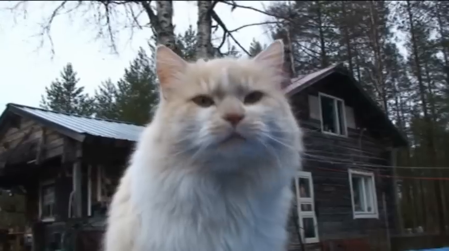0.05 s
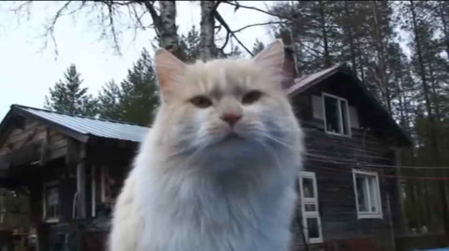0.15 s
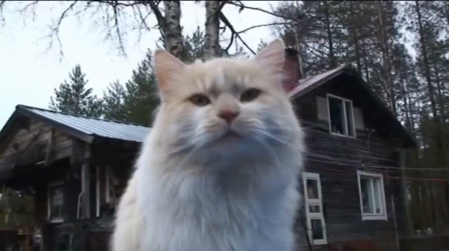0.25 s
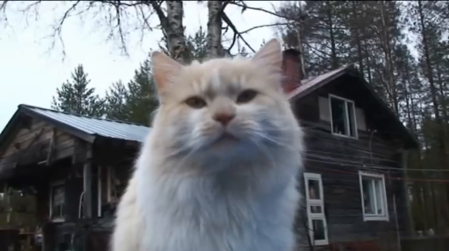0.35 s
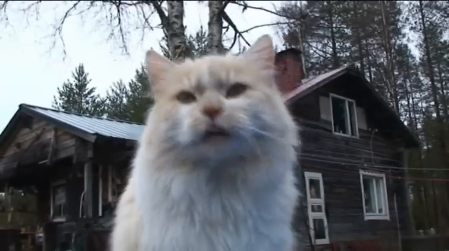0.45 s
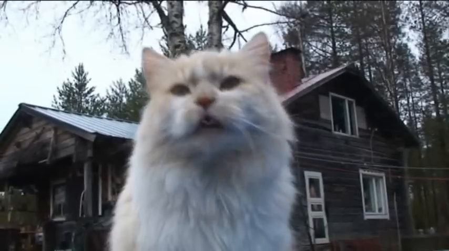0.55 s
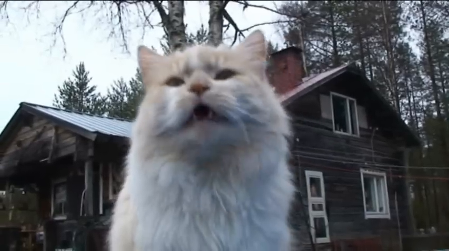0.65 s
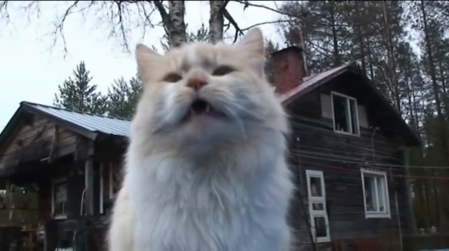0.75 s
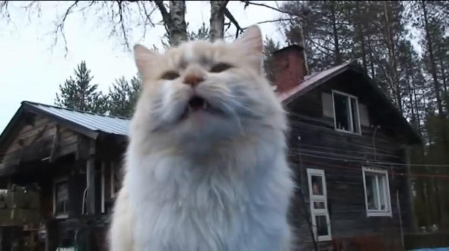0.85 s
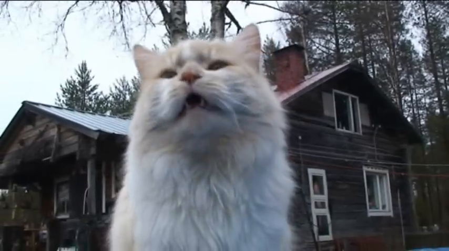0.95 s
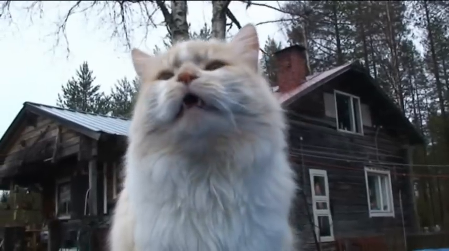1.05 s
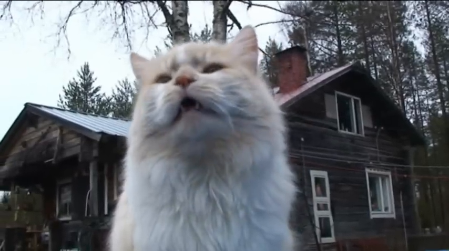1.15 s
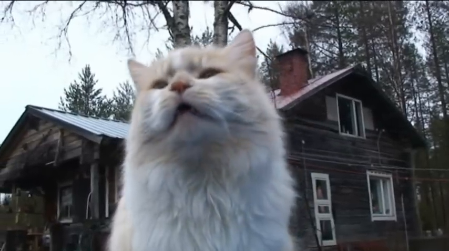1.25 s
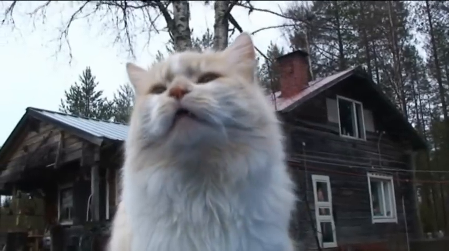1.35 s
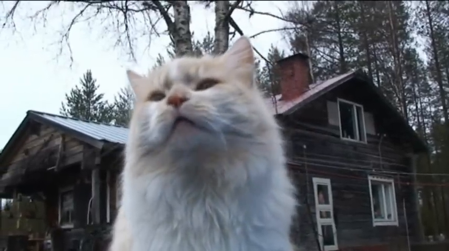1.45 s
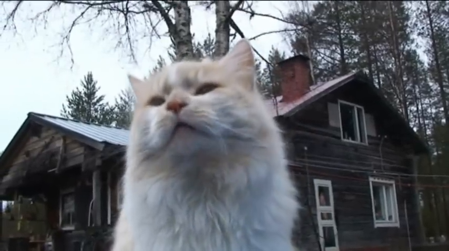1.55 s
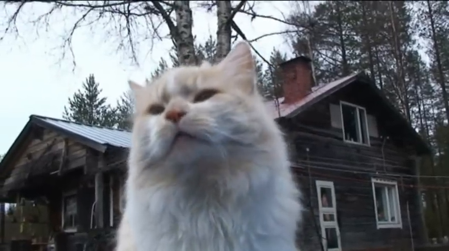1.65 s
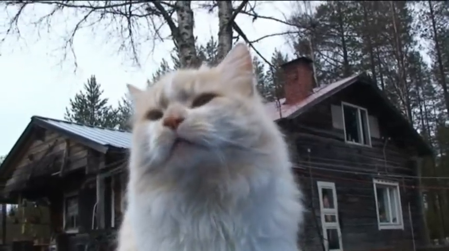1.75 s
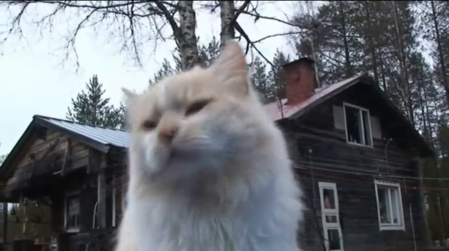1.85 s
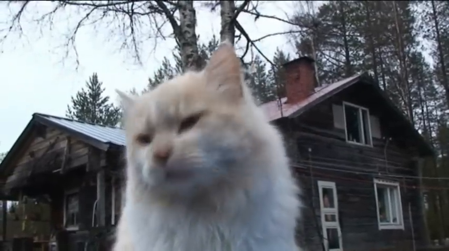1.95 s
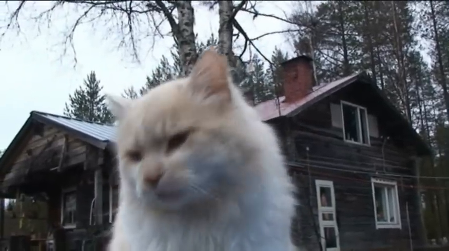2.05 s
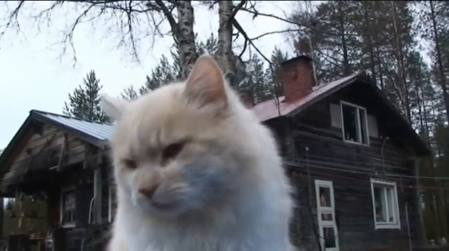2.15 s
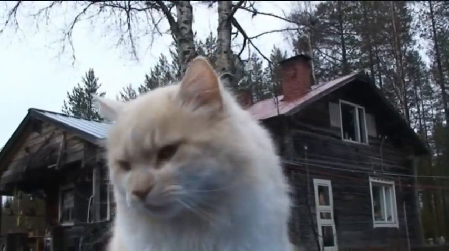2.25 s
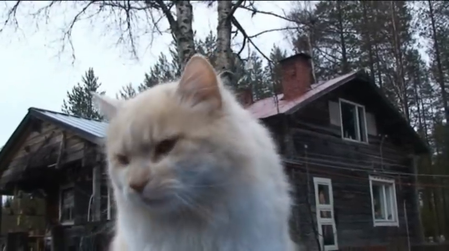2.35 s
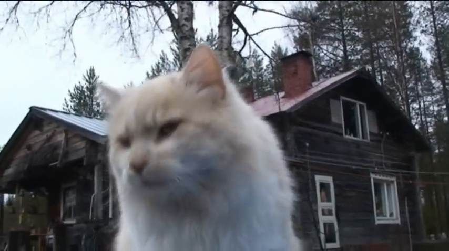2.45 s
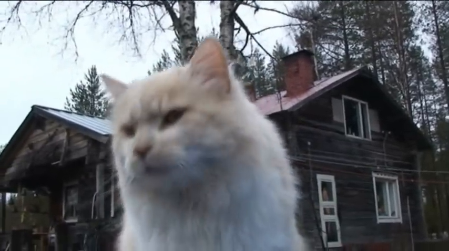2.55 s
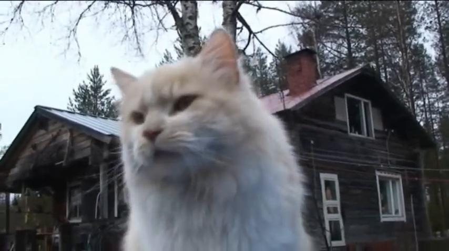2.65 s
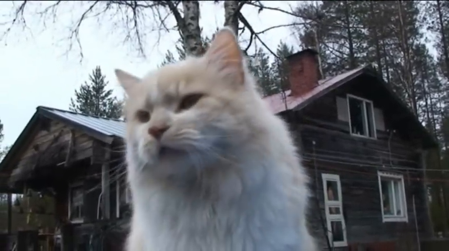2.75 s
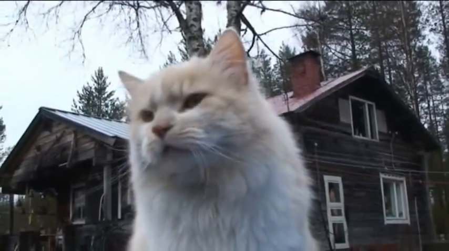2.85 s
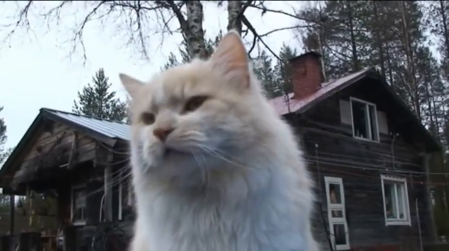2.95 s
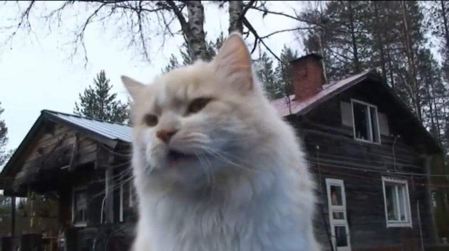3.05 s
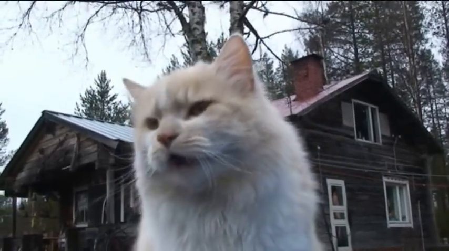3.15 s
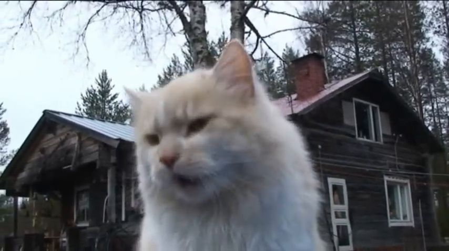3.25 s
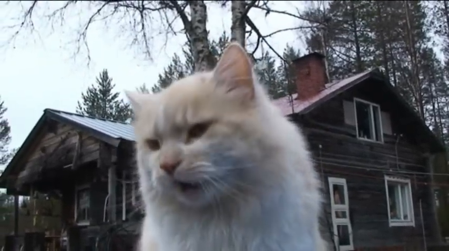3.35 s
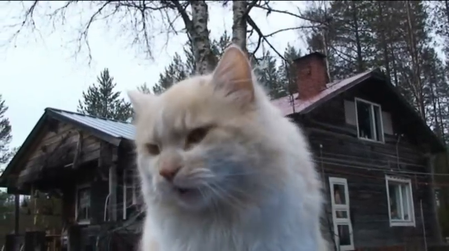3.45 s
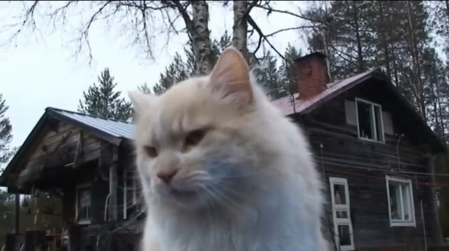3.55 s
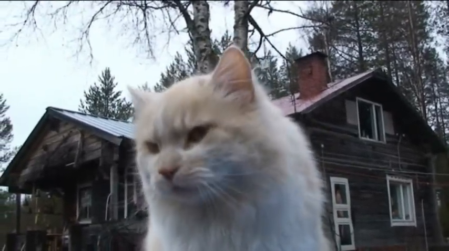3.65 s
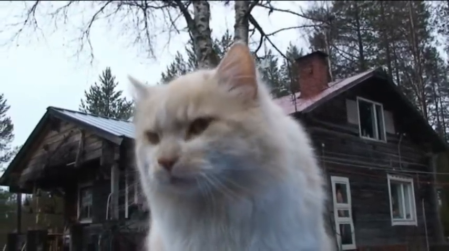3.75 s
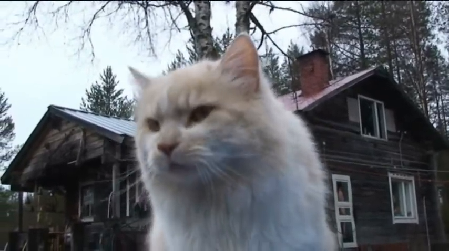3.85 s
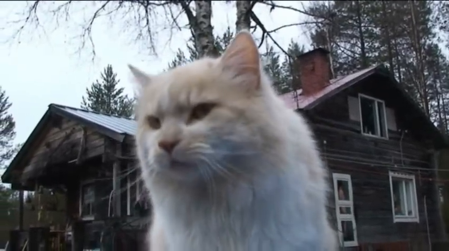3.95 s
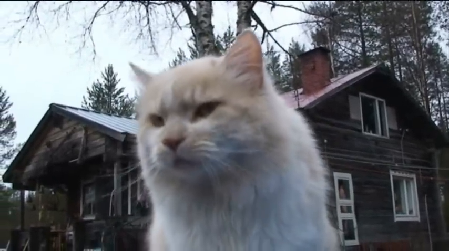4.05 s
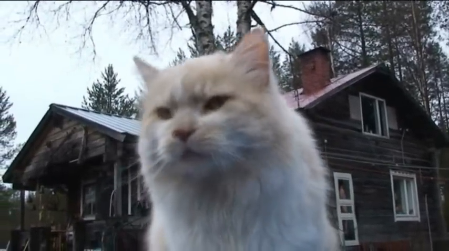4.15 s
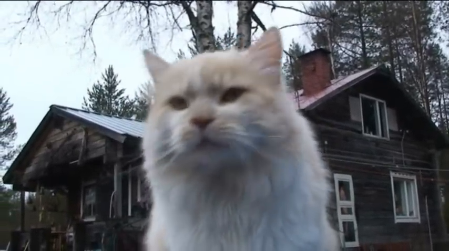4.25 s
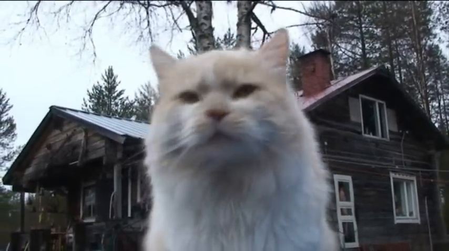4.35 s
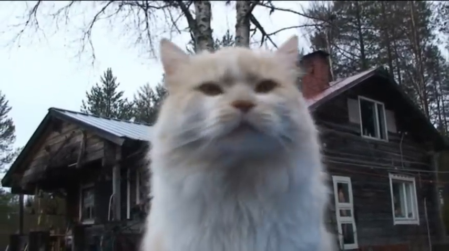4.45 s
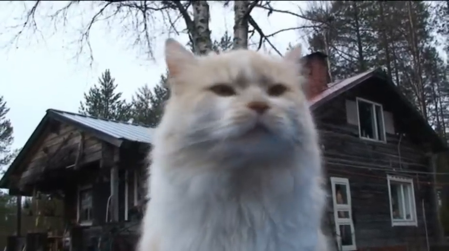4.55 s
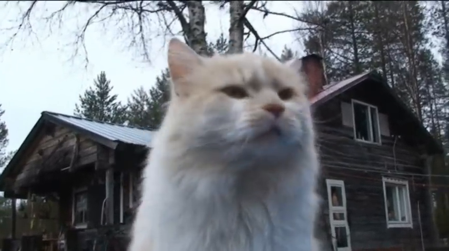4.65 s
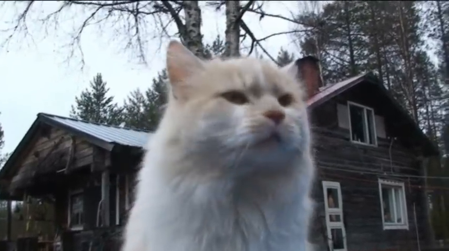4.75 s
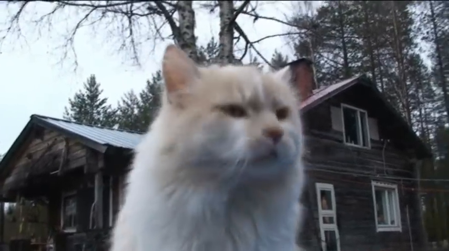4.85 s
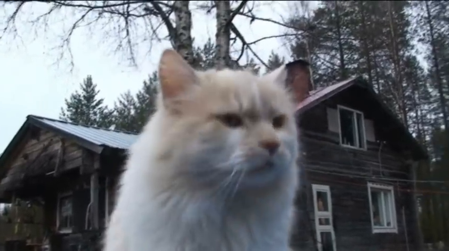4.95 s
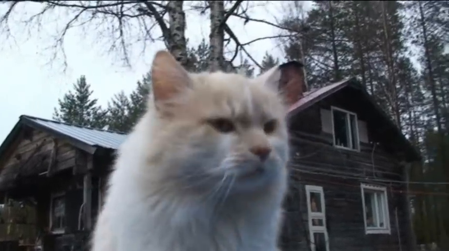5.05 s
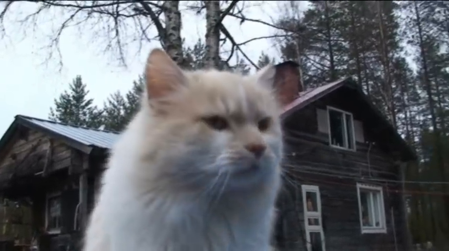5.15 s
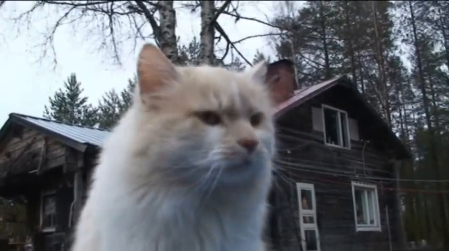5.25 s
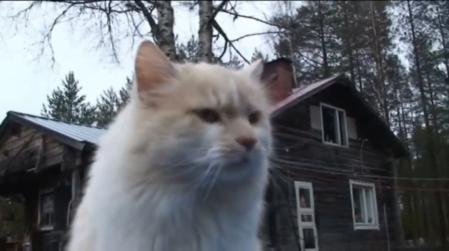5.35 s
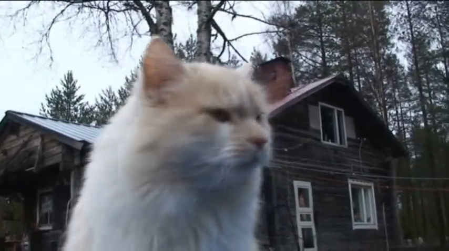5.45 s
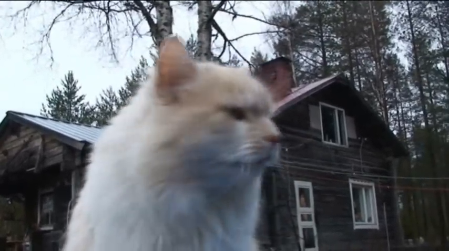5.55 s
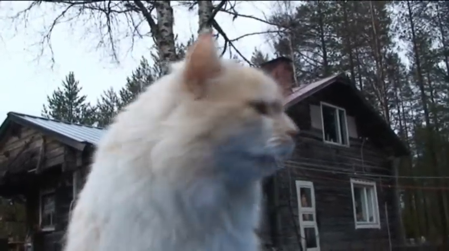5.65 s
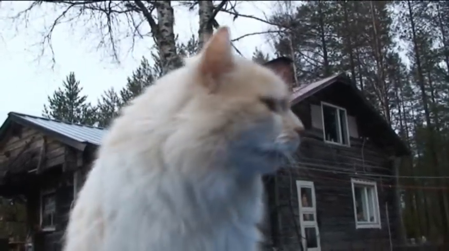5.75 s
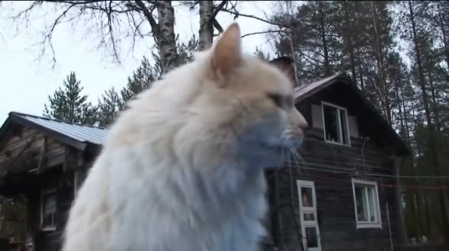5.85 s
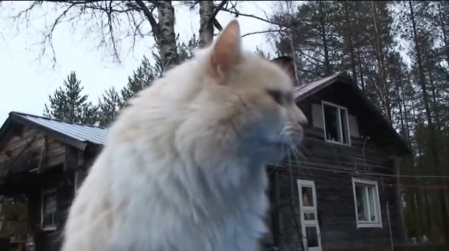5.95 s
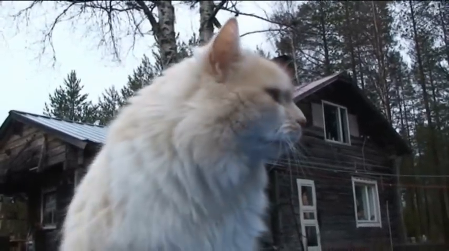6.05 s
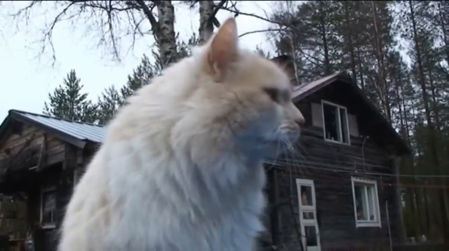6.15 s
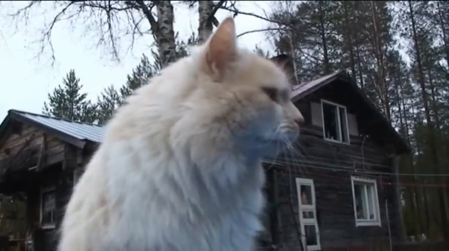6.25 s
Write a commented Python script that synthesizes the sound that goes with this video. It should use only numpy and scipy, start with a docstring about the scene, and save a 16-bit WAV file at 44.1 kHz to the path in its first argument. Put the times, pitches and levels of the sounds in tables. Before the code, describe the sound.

After a short rustle and hand thump, a cat meows three times with wet mouth clicks, over soft hiss, wind and motor hum.

```python
"""Quiet yard, a cat close in front of a hand-held camera; motor hum, microphone hiss and wind rumble throughout.
The take opens on a short rustle, dry ticks and hands bumping the housing, whose modes ring; more bumps follow.
A wet mouth click, then three meows, near 0.7, 3.0 and 5.6 s: gliding partials picked out by mouth resonances.
The voice stutters into each meow and cracks into uneven pulses; a few thin faint whistles come and go.
More clicks fall between and within the meows; a faint echo of the yard follows the cat."""
import sys
import numpy as np
from scipy import signal
from scipy.fft import rfft, irfft
from scipy.io import wavfile
from scipy.ndimage import uniform_filter1d

SR = 44100
rng = np.random.default_rng(int(sys.argv[2]) if len(sys.argv) > 2 else 0)


def level_to_linear(level):
    """Convert decibel levels to linear amplitude factors, elementwise."""
    exponent = np.asarray(level, float) / 20
    return 10 ** exponent


def persist_wave(psi):
    """Save psi, clipped to +-1, as 16-bit WAV."""
    counts = np.round(np.clip(psi, -1, 1) * 32767).astype(np.int16)
    wavfile.write(sys.argv[1], SR, np.atleast_2d(counts).T)


N = 277830  # 6.3 s
T = np.arange(N) / SR
OPPOSITE = np.array([[1], [-1]])  # a side signal enters left and right with opposite signs


def sides(pan_db):
    """Left and right gains that differ by pan_db, left minus right."""
    return level_to_linear(np.array([pan_db, -pan_db]) / 2).reshape(2, -1)


def walk(rate):
    """Random levels held for 1 / rate s and smoothed twice; spread near 1."""
    held = int(SR / rate)
    steps = np.repeat(rng.standard_normal(N // held + 1), held)
    smooth = uniform_filter1d(uniform_filter1d(steps, held), held)
    return np.sqrt(2) * smooth[:N]


def coloured(points):
    """Spectra of two unrelated noises of rms 1, coloured by points of f/Hz, level/dB."""
    hz, db = np.transpose(points)
    bins_hz = np.arange(N // 2 + 1) * SR / N
    gain = level_to_linear(np.interp(np.log(bins_hz + 1), np.log(hz), db))
    return rfft(rng.standard_normal((2, N))) * gain / np.sqrt(np.mean(gain ** 2))


def hold(start, end, fade):
    """Envelope that rises around start, stays at 1 and falls around end."""
    return np.clip(np.minimum(T - start, end - T) / fade + .5, 0, 1)


def add_mode(out, s, hz, t60, gain, rise=.0003, turns=0):
    """Adds a struck resonance: a sine from time s that rises quickly and decays 60 dB in t60 seconds."""
    i = int(s * SR)
    t = T[:min(int(t60 * SR), N - i)]
    envelope = (1 - np.exp(-t / rise)) * np.exp(-np.log(1000) * t / t60)
    out[..., i:i + len(t)] += gain * envelope * np.sin(2 * np.pi * (hz * t + turns))


# Motor partials: multiple of the motor rate, level/dB rms before waver and pan, left minus right/dB
MOTOR_PARTIALS = [(1, -60, 7), (4, -78, -1), (6, -80, 1.5), (14, -83, 1.5), (18, -82, 1.5), (28, -89, .1),
                  (30, -85, .1), (34, -87, .1), (36, -88, .1), (38, -86, .1), (44, -88, .1), (46, -87, .1),
                  (52, -86, .1)]


def motor_hum():
    """Harmonics of the motor's rate; all their levels waver a little together."""
    motor_hz = 150.
    waver_db = 1.1 * walk(12)
    start = rng.uniform(0, 2 * np.pi, len(MOTOR_PARTIALS))
    out = np.zeros((2, N))
    for (k, db, pan_db), phase in zip(MOTOR_PARTIALS, start):
        tone = np.sin(2 * np.pi * k * motor_hz * T + phase)
        out += np.sqrt(2) * level_to_linear(db + waver_db) * sides(pan_db) * tone
    return out


# Colour of the hiss above the low roll-off: f/Hz, relative level/dB per Hz
HISS_COLOUR = [(100, -34), (170, -7.5), (194, -8), (318, -10.5), (596, -11.5), (1700, -18), (2130, -18),
               (2480, -21), (14300, -26), (16000, -31.5)]
# Likeness of the left and right microphone hiss: f/Hz, likeness (0-1)
HISS_LIKENESS = [(200, 0.28), (1500, 0.29), (6000, 0.05), (15000, 0.2)]


def microphone_hiss():
    """Smooth coloured noise, partly shared by both sides: a mid noise plus a weaker opposed side noise."""
    hiss_db = -58  # rms of the mid
    mid, side = coloured([(20, -40), (90, -4.5)] + list(HISS_COLOUR))
    hz, share = np.transpose(HISS_LIKENESS)
    alike = np.clip(np.interp(np.arange(len(mid)) * SR / N, hz, share), 0, 1)
    side_gain = np.sqrt((1 - alike) / (1 + alike))
    return level_to_linear(hiss_db) * irfft(mid + side * side_gain * OPPOSITE, N)


# Wind gusts: centre t/s, half length/s, level over the steady wind/dB
WIND_GUSTS = [(0.177, 0.11, 9), (2.05, 0.31, 0), (3.6, 0.12, 4.5), (4.014, 0.068, 7)]


def wind_rumble():
    """Low noise of its own on each side; slow swells and gusts move both, faster flutter moves each alone."""
    wind_db, swell_db, flutter_db = -55.5, 2.3, 1.9
    colour = [(5, -21), (20, 2.0), (45, -0.5), (75, -1), (110, -6.5), (200, -14.0), (400, -42.0)]
    rumble = irfft(coloured(colour), N)
    level_db = wind_db + swell_db * walk(3.25)
    for s, half, db in WIND_GUSTS:
        level_db += db * np.exp(-((T - s) / half) ** 2)
    return rumble * level_to_linear(level_db + flutter_db * np.array([walk(9.1), walk(8.4)]))


def rustle():
    """Coloured noise, under way as the take opens, that surges briefly and stops."""
    level_db, surge_db, surge_s, end_s = -46.5, 3.5, 0.033, .048
    mid, side = irfft(coloured([(200, 5), (900, 2), (3500, -1.5), (7000, -13), (16000, -25.0)]), N)
    surge = surge_db * np.exp(-((T - surge_s) / 0.0089) ** 2)
    level = level_to_linear(level_db + surge + 0.76 * walk(280))
    return (mid + 0.59 * side * OPPOSITE) * hold(-1, end_s, 0.0081) * level


# Faint dry ticks: t/s, level of the lower ring/dB, lower ring f/Hz
DRY_TICKS = [(0.03, -32.5, 2420), (0.083, -41.5, 2060), (0.179, -45, 3260), (1.995, -46.5, 2500),
             (4.59, -48, 3000), (5.484, -50, 2140)]


def ticks():
    """Fur or fingers tick: two short rings, centred between the sides."""
    out = np.zeros((2, N))
    for s, db, hz in DRY_TICKS:
        add_mode(out, s, hz, .012, level_to_linear(db))
        add_mode(out, s, 1.29 * hz, .008, level_to_linear(db - 1))
    return out


# Modes of the camera housing: f/Hz, relative level/dB, t60/s, left minus right/dB,
# phase at the blow/turns, lead of the right side/turns
HOUSING_MODES = [(47.5, -3, 1.34, -4.5, 0.07, -0.063), (74.4, 3, 0.23, 0, 0.0051, -0.017),
                 (89.7, -8.5, 0.61, 3, -0.1, -0.11), (155, -1, .07, 12, -.45, .05),
                 (232, 0, .075, 8, .21, .1), (396, -2.5, 0.049, 4, 0.22, 0.27),
                 (578, -3.5, 0.04, 0, -0.07, 0.3)]
# Bumps: t/s, level/dB, f/Hz where the push is strongest, fall-off either side/dB per octave
# (slow pushes are narrow, quick taps broad)
HAND_BUMPS = [(.047, -25, 47, 19), (0.0813, -17.5, 205, 6.4), (.9, -45.5, 82, 16), (1.9, -41.5, 232, 7),
              (1.92, -44, 82, 12), (1.941, -36, 201, 7), (1.993, -35.5, 232, 7.9), (3.401, -39, 82.3, 17),
              (3.417, -36.5, 81.6, 22), (3.488, -41.5, 64.5, 12), (3.661, -47, 84, 16),
              (3.843, -43, 80.4, 22), (4.06, -50, 82, 3), (5.708, -36.5, 82, 30), (5.75, -44, 82, 21),
              (5.766, -33, 79, 27), (5.806, -62, 80, 9)]


def bumps():
    """Hands shift on the housing and its modes reach the microphones through the plastic."""
    out = np.zeros((2, N))
    for s, blow_db, push_hz, fall_db in HAND_BUMPS:
        for hz, db, t60, pan_db, turns, lead in HOUSING_MODES:
            reach_db = blow_db - fall_db * abs(np.log2(hz / push_hz))
            phases = turns + np.array([[0], [lead]])
            add_mode(out, s, hz, t60, level_to_linear(db + reach_db) * sides(pan_db), .003, phases)
    return out


# Wet mouth clicks: t/s, level/dB, lowest ring f/Hz, left minus right/dB
MOUTH_CLICKS = [(0.6748, -28, 1350, 5), (1.495, -36, 765, 4.5), (2.9034, -35.5, 1250, 5),
                (5.609, -47, 1720, 4), (6.138, -48, 1300, -1)]
# Rings of each click: multiple of the lowest ring, relative level/dB, t60/s
CLICK_RINGS = [(1, -2, .018), (1.25, -7, .009), (1.55, 0, .012), (1.8, -9, .006), (4.6, -17, .007)]


def mouth_clicks():
    """Tongue and lips parting ring the mouth: several short modes start at once."""
    out = np.zeros((2, N))
    for s, db, hz, pan_db in MOUTH_CLICKS:
        for k, mode_db, t60 in CLICK_RINGS:
            add_mode(out, s, k * hz, t60, level_to_linear(db + mode_db) * sides(pan_db))
    return out


def meow_at(s):
    """Index of the meow whose middle is nearest in time."""
    return np.argmin([abs(s - (rows[0][0] + rows[-1][0]) / 2) for rows in MEOW_TRACKS])


# One track per meow: t/s, pitch f/Hz, first partial level/dB before shimmer and pan,
# mouth opening as second partial over first/dB, rasp as upper partials over first/dB
MEOW_TRACKS = [
    [(.776, 730, -46, -9.5, -19), (.8, 817, -42.5, -10, -22), (.83, 934, -46, 6, -23),
     (.87, 1010, -47.5, 3.5, -14.5), (.965, 1057, -49, 2.5, -12.5), (1.1, 1081, -49, -0.5, -20),
     (1.16, 1105, -49.5, -2.5, -15), (1.22, 1066, -49.5, -2.5, -16), (1.36, 1002, -48.5, -5.5, -19.5),
     (1.432, 990, -47.5, -10, -30.5)],
    [(3.117, 770, -41, -16, -29), (3.14, 844, -42, -12.5, -28), (3.17, 902, -43, -18, -28),
     (3.195, 908, -44.5, -5, -18), (3.225, 966, -43.5, -2, -19.5), (3.28, 957, -45, 0.8, -17),
     (3.35, 1018, -47, 0, -15.5), (3.43, 1049, -47.5, 2.5, -13), (3.49, 1025, -46.5, -0.5, -17.5),
     (3.58, 995, -47, -3, -25), (3.625, 950, -48.5, -1.5, -18)],
    [(5.596, 589, -58, -9, -19), (5.63, 638, -48, -5.5, -30), (5.665, 766, -40.5, 3, -35),
     (5.7, 796, -41, -4.5, -28), (5.75, 902, -45, -3.5, -17.5), (5.81, 949, -47, -5.5, -18),
     (5.87, 1026, -50.5, 2, -20), (5.935, 1093, -49.5, -1, -20), (5.97, 972, -51.5, 1, -15),
     (6.035, 1057, -49.5, -8.5, -30), (6.07, 978, -51, -8, -30), (6.12, 966, -49, -25, -32),
     (6.19, 911, -54.5, -21, -15)],
]
# False starts before the folds keep their beat: t/s, length/s, pitch f/Hz, level/dB, opening/dB
FALSE_STARTS = [(0.741, 0.026, 795, -59, -20), (3.034, 0.0085, 650, -51.5, -5),
                (3.06, 0.016, 696, -45.5, -13.5), (3.091, .013, 764, -44, -14), (5.55, 0.043, 586, -58, -1)]
# How the cat holds its head in each meow: throat ring f/Hz, top ring f/Hz at a pitch of 1 kHz,
# top ring over first partial/dB at an opening of 0 dB, left minus right/dB
HEAD_POSES = [(3100, 6130, -28.5, 4.5), (3440, 5870, -28, 5.5), (3240, 5800, -32.5, 3.5)]
# Mouth rings for partials above the second: f/Hz, width/Hz, level relative to the throat ring/dB
MOUTH_RINGS = [(4900, 760, -11.5), (9700, 640, -13)]
# Spells in which every other cycle differs: t/s, length/s, level of the half-way lines/dB
CYCLE_DOUBLINGS = [(1.165, 0.088, -54.5), (1.264, .03, -55), (1.396, 0.0333, -54.5)]
# The lines this puts between the partials: multiple of the pitch, level relative to the spell/dB
HALFWAY_LINES = [(.5, -14), (1.5, -1), (2.5, -15.5), (3.5, -11)]


def pitch_wander():
    """Pitch factor: random jitter, a tremor in the second meow and a leap around each crack."""
    tremor_hz, tremor_dip_s, tremor_percent = 29.2, 3.405, 1.6
    tremor = tremor_percent * hold(3.18, 3.44, .03) * np.cos(2 * np.pi * tremor_hz * (T - tremor_dip_s))
    factor = 1 + 0.0047 * walk(70) + 0.007 * walk(400) - tremor / 100
    for s, _, _, _, leap in VOICE_CRACKS:
        factor += leap / 100 * np.exp(-((T - s - .001) / .0045) ** 2)
    return factor


def crack_dip():
    """Gain of the clear voice, which weakens in a crack as the pitch leaps up."""
    dip_db = np.zeros(N)
    for s, length, _, _, leap in VOICE_CRACKS:
        dip_db[(T > s) & (T < s + length)] = -0.2252 * leap  # dB per % of leap
    return level_to_linear(uniform_filter1d(dip_db, size=60))


def voice():
    """Near-pure partials on the gliding pitch; the mouth picks out the upper ones."""
    throat_width_hz, top_width_hz = 1420, 450
    top_hz_per_pitch_hz, top_db_per_opening_db = 1.1, .4
    air_db, air_width_hz = 3, 300  # air through the folds makes the top ring hiss; dB over that ring's level
    stutter_rasp_db = -30.5
    out = np.zeros((2, N))
    wander, dip = pitch_wander(), crack_dip()
    shimmer = [walk(80) for _ in range(10)]
    air = walk(air_width_hz)
    doubling = sum(level_to_linear(db) * hold(s, s + length, .01) for s, length, db in CYCLE_DOUBLINGS)
    stutters = [[(at, *rest, stutter_rasp_db) for at in (s, s + length)] for s, length, *rest in FALSE_STARTS]
    for rows in MEOW_TRACKS + stutters:
        s, *columns = np.transpose(rows)
        throat_hz, top_hz, top_db, pan_db = HEAD_POSES[meow_at(s[0])]
        on = (T > s[0] - .001) & (T < s[-1] + .001)
        t = T[on]
        hz, first_db, open_db, rasp_db = (np.interp(t, s, c) for c in columns)
        phase = 2 * np.pi * np.cumsum(hz * wander[on]) / SR
        # weak partials come and go
        flicker_db = [2.8 * w[on] for w in shimmer]
        tone = level_to_linear(first_db + 0.48 * shimmer[0][on]) * np.sin(phase)
        tone += level_to_linear(first_db + open_db + 1.05 * shimmer[1][on]) * np.sin(2 * phase + 1)
        # the top ring follows pitch and opening; rasp lifts the other rings
        ring_hz = top_hz + top_hz_per_pitch_hz * (hz - 1000)
        ring_db = top_db + top_db_per_opening_db * open_db
        rings = [(f, w, db + rasp_db) for f, w, db in MOUTH_RINGS + [(throat_hz, throat_width_hz, 0)]]
        rings.append((ring_hz, top_width_hz, ring_db))
        for k in range(3, 11):
            mouth = sum(level_to_linear(db) / (1 + (2 * (k * hz - f) / w) ** 4) for f, w, db in rings)
            tone += level_to_linear(first_db + flicker_db[k - 1]) * mouth * np.sin(k * phase + k)
        tone += level_to_linear(first_db + ring_db + air_db) * air[on] * np.sin(2 * np.pi * np.cumsum(ring_hz) / SR)
        halfway = sum(level_to_linear(db) * np.sin(k * phase) for k, db in HALFWAY_LINES)
        tone += doubling[on] * level_to_linear(flicker_db[0]) * halfway
        # the folds start and stop within a few cycles
        edge = np.clip(np.minimum(t - t[0], t[-1] - t) / 0.0019, 0, 1)
        out[:, on] += np.sqrt(2) * tone * edge * dip[on] * sides(pan_db)
    return out


# The vocal folds lose their beat: t/s, length/s, typical pulse level/dB, ring f/Hz, pitch leap/%
VOICE_CRACKS = [(0.87, .007, -30.5, 1800, 15.5), (0.898, .003, -30, 1680, 10),
                (0.934, .004, -27, 1740, 14.5), (0.9375, .008, -30.5, 1520, -7),
                (1.15, .003, -31, 1700, 11.5), (1.1562, .011, -32.5, 1548, -11.5),
                (1.199, .009, -36.5, 1720, 10), (1.4016, .012, -39.5, 1608, 5),
                (1.428, .009, -37.5, 1544, 3.5), (1.434, .016, -40.5, 870, 0), (2.962, .006, -43, 815, 0),
                (2.969, .009, -46, 1450, 0), (3.677, .018, -45.5, 960, 0),
                (5.585, 0.0045, -43.5, 2080, -1.5), (6.033, 0.0049, -39.5, 1530, 8)]


def cracks():
    """Uneven single pulses of the folds, each ringing the throat for a moment."""
    out = np.zeros((2, N))
    chances = rng.standard_normal((len(VOICE_CRACKS), 12, 3))
    for (s, length, db, hz, _), chance in zip(VOICE_CRACKS, chances):
        gaps = .0022 * np.exp(.3 * chance[:, 0])  # s between pulses
        at = s + np.cumsum(gaps) - gaps[0]
        head = sides(HEAD_POSES[meow_at(s)][-1])
        for pulse_s, c in zip(at[at < s + length], chance):
            add_mode(out, pulse_s, hz * (1 + .1 * c[1]), .011, level_to_linear(db + 1.5 * c[2]) * head, .0004)
    return out


# Thin faint tones: from t/s, to t/s, f/Hz, level at the fullest/dB rms
THIN_TONES = [(1.48, 1.51, 3150, -68), (1.5, 1.625, 2870, -68), (3.61, 3.66, 4450, -67),
              (4.035, 4.07, 1130, -66)]


def whistles():
    """Sines of slightly unsteady pitch that swell and fade."""
    wavering_s = np.cumsum(1 + .008 * walk(40)) / SR
    out = np.zeros(N)
    for start, end, hz, db in THIN_TONES:
        swell = np.sin(np.pi * np.clip((T - start) / (end - start), 0, 1)) ** .5
        out += np.sqrt(2) * level_to_linear(db) * swell * np.sin(2 * np.pi * hz * wavering_s)
    return out


def yard_echo(near):
    """Faint early echo from the yard: the near sounds smeared by a decaying noise on each side."""
    t60, level_db = 0.25, -24
    tail = rng.standard_normal((2, SR // 4)) * np.exp(-np.log(1000) * T[:SR // 4] / t60)
    tail /= np.sqrt(np.sum(tail ** 2, axis=1, keepdims=True))
    return level_to_linear(level_db) * signal.fftconvolve(near, tail, axes=1)[:, :N]


def scene():
    """The cat, rustle, ticks and whistles with their yard echo, over the camera's own sounds and the wind."""
    near = rustle() + ticks() + mouth_clicks() + voice() + cracks() + whistles()
    background = motor_hum() + microphone_hiss() + wind_rumble()
    return near + yard_echo(near) + bumps() + background


def low_pass(x):
    """Removes everything above the highest recorded frequency."""
    return signal.sosfilt(signal.butter(12, 16180, fs=SR, output="sos"), x)


def record(dry):
    """The finished mix as it is stored."""
    return low_pass(dry)


dry = scene()
out = record(dry)
persist_wave(out)
```